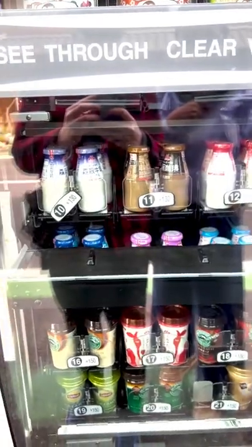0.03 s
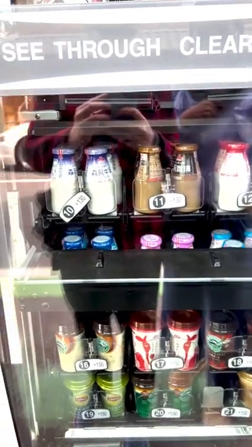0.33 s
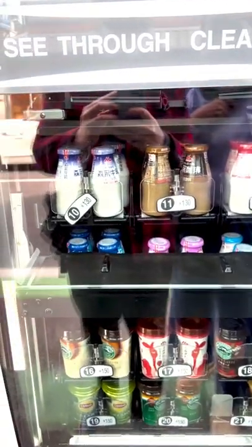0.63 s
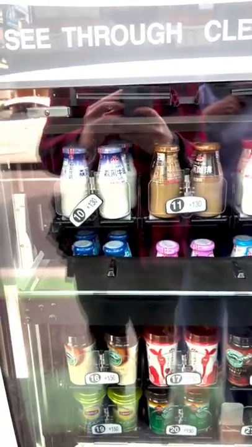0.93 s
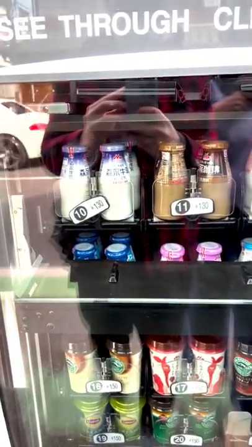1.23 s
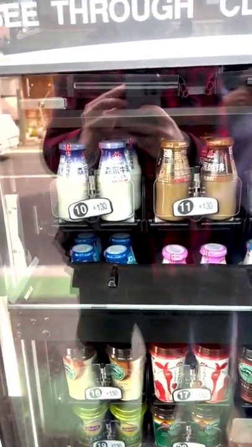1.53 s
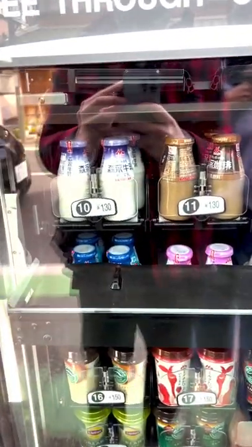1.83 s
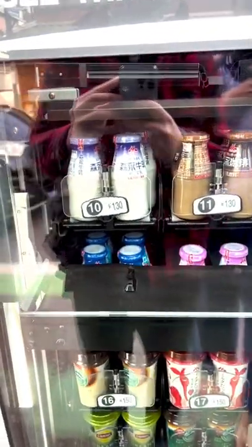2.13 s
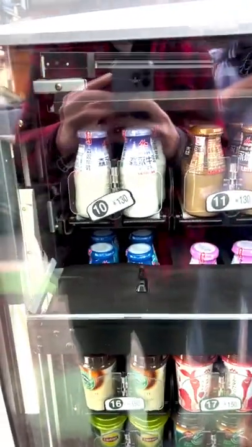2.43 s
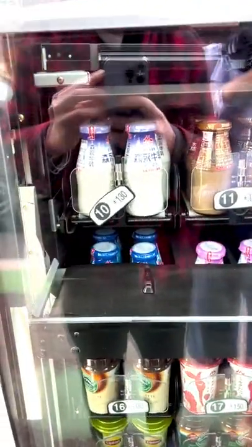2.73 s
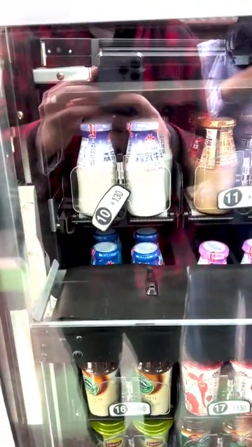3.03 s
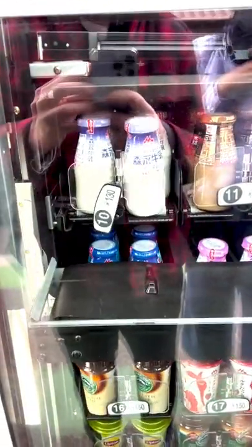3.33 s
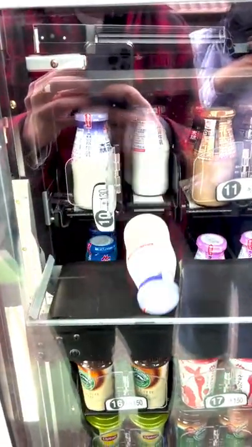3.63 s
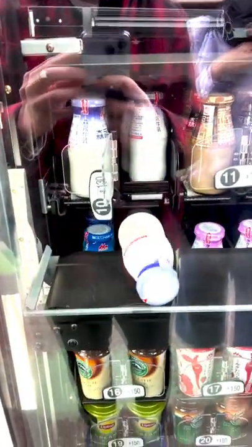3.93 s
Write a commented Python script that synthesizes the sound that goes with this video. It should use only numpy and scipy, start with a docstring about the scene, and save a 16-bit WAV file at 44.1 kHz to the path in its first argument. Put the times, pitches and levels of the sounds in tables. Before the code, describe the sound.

A vending machine clicks, hums and drops a bottle with a loud clunk over traffic rumble.

```python
"""Steady traffic rumbles, and dull knocks sound from a glass-fronted vending machine close by.
Its mechanism clicks, then a motor hums up to speed and pushes a row of faintly creaking plastic bottles.
One leaves its shelf, scrapes past the pinging gate and lands with a clunk, the loudest moment:
its shell cracks briefly and the delivery tray rattles and rings low. Short reflections inside the
cabinet follow the clicks and the landing, while the street carries on behind."""
import sys
import numpy as np
from scipy import signal
from scipy.fft import rfft, irfft
from scipy.io import wavfile
from scipy.ndimage import uniform_filter1d, minimum_filter1d

SR = 44100
rng = np.random.default_rng(int(sys.argv[2]) if len(sys.argv) > 2 else 0)


def pcm_store(signal):
    """Save signal as 16-bit PCM."""
    levels = np.round(np.clip(np.atleast_2d(signal), -1, 1) * 32767)
    wavfile.write(sys.argv[1], SR, levels.astype(np.int16).T)


N = 176400
T = np.arange(N) / SR
HZ = np.fft.rfftfreq(N, 1 / SR)


# the bottle lands with one clunk: a main layer and a far fainter one
# (time [s], thud [dB], crack [dB], hardness [Hz])
CLUNK = [(3.6198, 9.5, -20.5, 2500), (3.6297, -20, -56, 650)]
# modes of the delivery tray (pitch [Hz], relative level [dB], t60 [s])
TRAY_MODES = [(73, -23.5, 0.23), (112.6, -19, 0.15), (131.7, -14, 0.73), (155.7, -27, 0.57),
              (256.3, -12.5, 0.18), (280.3, -12, 0.26), (313, -29.5, 0.17), (335, -20, 0.29),
              (363, -17, 0.05), (527, -35, 0.042), (534, -25, 0.14), (604, -20, 0.09), (670, -36.5, 0.18),
              (756, -35.5, 0.15), (833, -35, 0.05), (1006, -25.5, 0.053)]

def tray(lag_s=0.0029, rise_s=0.0022):
    """The landing bottle sets the tray's modes ringing; the bass booms on."""
    out = 0
    for hz, db, t60 in TRAY_MODES:
        lean_db = 4.5 * max(np.log2(hz / 330), 0)  # higher modes sit further left
        mode = 0
        for start, thud_db, _, hard_hz in CLUNK:
            force = amp(thud_db) / np.hypot(1, (hz / hard_hz) ** 2)
            mode = mode + force * ring(start + lag_s, hz, t60, rise_s)
        out = out + amp(db) * pan(lean_db) * mode
    return out


# tone of the first snap (frequency [Hz], relative level [dB])
SNAP_COLOUR = [(300, -3), (900, 12), (2000, -6), (6000, -12), (8000, -7), (10000, -13.5), (11600, -22),
               (13000, -40)]
# tone of the tray's many small, close modes (frequency [Hz], relative level [dB])
RATTLE_COLOUR = [(18, -25), (42, 4), (120, 2), (210, 8), (380, 4), (480, 6.5), (750, -8.5), (1200, -22.5),
                 (2000, -31), (4000, -55)]

def first_contact(snap_db=-27, rattle_db=-9.5):
    """The bottle's first touch snaps sharply and shakes the tray into a short, dense rattle."""
    start = CLUNK[0][0]
    snap = unit(colour(stereo_noise(0.45), amp(read(SNAP_COLOUR, HZ))))
    snap *= decay(start, t60=0.0098, rise=0.00018, hold=0.0012)
    rattle = unit(colour(stereo_noise(0.5), amp(read(RATTLE_COLOUR, HZ))))
    rattle *= decay(start, t60=0.19, rise=0.0032)
    return amp(snap_db) * snap + amp(rattle_db) * rattle


# resonances of the plastic bottle (centre [Hz], width [Hz], relative level [dB])
BOTTLE_BANDS = [(1550, 350, -1), (2030, 530, 0), (2520, 300, -6), (3180, 430, -1.5), (4340, 520, -5.5),
                (5660, 400, -0.5), (6830, 500, -6.5), (7900, 450, -8.5)]

def bottle_crack():
    """The plastic shell cracks briefly as it hits the tray."""
    out = 0
    for hz, width_hz, db in BOTTLE_BANDS:
        length = (2000 / hz) ** 0.6  # higher bands die sooner
        envelope = sum(amp(crack_db) * decay(start, 0.042 * length, rise=0.00014, hold=0.0053 * length)
                       for start, _, crack_db, _ in CLUNK)
        out = out + amp(db) * envelope * unit(colour(stereo_noise(0.93), peak(hz, width_hz)))
    return out / len(BOTTLE_BANDS) * 2 * pan(lean_db=3)


# envelope of the bottle rubbing the gate (time [s], level [dB])
SCRAPE_LEVEL = [(3.559, -59), (3.567, -31.5), (3.577, -34), (3.598, -31.5), (3.611, -36.5), (3.621, -31)]
# tone of that rub (frequency [Hz], relative level [dB])
SCRAPE_COLOUR = [(150, 15.5), (310, 23.5), (480, 7), (700, 15), (1000, 14), (1500, -3), (2700, -5.5),
                 (3400, 4), (4700, -4.5), (7500, -5.5), (10000, -14), (11600, -20), (12500, -47)]

def gate_scrape(slips_per_s=20000, slip_spread_db=4, ping_db=-30.5):
    """The gate pings as it lets go, and the bottle slides past it in a run of tiny slips."""
    slips = rng.random(N) < slips_per_s / SR
    strength = amp(slip_spread_db * np.minimum(rng.exponential(1, N), 2))
    rub = unit(colour(slips * strength * stereo_noise(0.66), amp(read(SCRAPE_COLOUR, HZ))))
    level_db = np.interp(T, *np.transpose(SCRAPE_LEVEL), left=-np.inf, right=-np.inf)
    ping = ring(start=3.5665, hz=2045, t60=0.046, rise=0.002)
    return amp(level_db) * rub + amp(ping_db) * ping


# run of the dispensing motor (time [s], speed [Hz], level [dB])
MOTOR_RUN = [(2.148, 58.2, -61), (2.21, 59, -30), (2.26, 60.75, -35), (2.321, 64.44, -22),
             (2.469, 72.53, -21), (2.569, 78.97, -17), (2.71, 82.8, -23), (2.81, 82.2, -21.5),
             (2.94, 80.9, -26), (3.019, 81.16, -22), (3.42, 81.1, -25.5), (3.48, 81.5, -36)]
# partials of its hum (multiple of the speed, relative level [dB], change at full strain [dB])
MOTOR_ORDERS = [(.5, -38, -5), (1, -0.5, 0.5), (1.5, -23, -9), (2, -21, 12), (3, -32, 5)]
# narrow resonances it shakes (centre [Hz], width [Hz], level at the motor's loudest [dB])
MOTOR_RINGS = [(40.7, 9.7, -40.5), (427.2, 9.5, -46)]

def motor(full_strain_hz_per_s=87, ease_s=0.1, waver_db=-0.24):
    """A low hum that spins up with straining overtones, holds its speed and stops as the bottle tips."""
    times, speeds, levels = np.transpose(MOTOR_RUN)
    hz = np.interp(T, times, speeds)
    fade = np.interp(T, [times[0] - 0.02, times[0], times[-1], times[-1] + 0.024], [0, 1, 1, 0])
    gain = amp(np.interp(T, times, levels)) * fade
    strain = np.clip(np.gradient(hz, T) / full_strain_hz_per_s, 0, 1)
    strain = uniform_filter1d(strain, round(ease_s * SR))
    turns = np.cumsum(hz) / SR
    hum = 0
    for multiple, db, strain_db in MOTOR_ORDERS:
        waver = unit(colour(rng.standard_normal(N), peak(0, width_hz=18)))
        tone = np.sqrt(2) * np.sin(2 * np.pi * multiple * turns)
        hum = hum + amp(db + strain_db * strain + waver_db * waver) * tone
    rings = sum(amp(db) * unit(colour(rng.standard_normal(N), peak(centre, width)))
                for centre, width, db in MOTOR_RINGS)
    return gain * hum + np.sqrt(gain / gain.max()) * rings


# dull knocks (time [s], pitch [Hz], level [dB])
KNOCKS = [(.441, 259, -20.5), (.463, 180.6, -19), (0.697, 292, -27.5), (3.858, 439, -29.5)]

def knocks(t60_s=0.15, rise_s=0.014, puff_db=-7):
    """Soft, hollow bumps: a low note in a dull puff of noise."""
    puff = amp(puff_db) * unit(colour(stereo_noise(0.83), peak(hz=240, width_hz=150)))
    return sum(amp(db) * (ring(start, hz, t60_s, rise_s) + puff * decay(start, t60_s, rise_s))
               for start, hz, db in KNOCKS)


# clicks of the mechanism (time [s], level [dB], t60 [s], treble cutoff [Hz])
CLICKS = [(1.3987, -48, 0.022, 7000), (1.5062, -34, 0.0055, 10000), (1.5247, -30.5, 0.0066, 15000),
          (1.548, -33, 0.0096, 12000), (1.552, -42, .025, 10500), (1.5579, -33.5, 0.019, 9500),
          (1.566, -40.5, .014, 7000), (1.7897, -41, 0.017, 9000), (1.797, -50, 0.13, 6500),
          (1.883, -48, .04, 9600), (1.888, -37.5, .022, 1880)]
# tone they share (frequency [Hz], relative level [dB])
CLICK_COLOUR = [(300, -28), (1500, -2), (2600, -7), (3600, 7), (4900, -1.5), (7800, 0), (10000, -7.5),
                (12000, -3), (15000, -20)]

def clicks():
    """Small dry ticks of the mechanism: bursts of noise, each with its own brightness."""
    noise, tone = stereo_noise(0.61), amp(read(CLICK_COLOUR, HZ))
    out = 0
    for start, db, t60, top_hz in CLICKS:
        tick = unit(colour(noise, tone / np.hypot(1, (HZ / top_hz) ** 10)))
        out = out + amp(db) * decay(start, t60, rise=0.00037, hold=0.0005) * tick
    return out


# thin creaks of the pushed bottles (time [s], pitch [Hz], level [dB])
CREAKS = [(2.632, 10300, -48), (3.166, 11000, -47), (3.346, 11740, -44)]

def creaks(width_hz=2300):
    """Faint, very high ticks as the row of bottles shifts."""
    noise = stereo_noise(0.3)
    return sum(amp(db) * decay(start, t60=0.015, rise=0.00071) * unit(colour(noise, peak(hz, width_hz)))
               for start, hz, db in CREAKS)


def cabinet(x, echo_db=-9.5, t60_s=0.052, predelay_s=0.003, band_hz=(450, 8500)):
    """Adds short, dense reflections inside the machine, without deep bass or top treble."""
    t = np.arange(SR // 3) / SR
    reflections = rng.standard_normal((2, len(t))) * amp(-60 * t / t60_s) * (t > predelay_s)
    reflections /= np.linalg.norm(reflections, axis=1, keepdims=True)
    send = signal.sosfilt(signal.butter(4, band_hz, "band", fs=SR, output="sos"), x)
    return x + amp(echo_db) * signal.fftconvolve(send, reflections, axes=1)[:, :N]


# tone of the traffic bed (frequency [Hz], relative level [dB])
STREET_COLOUR = [(12, -57), (24, -30), (36, -6.5), (55, -6.5), (82, 0.86), (112, -6), (145, -5.5),
                 (205, -12.5), (300, -15.5), (350, -20), (425, -17.5), (490, -23), (700, -21), (950, -25.5),
                 (1250, -27), (2400, -34.5), (3700, -37.5), (5000, -43.5), (6700, -44.5), (8800, -48),
                 (10200, -52.5), (11600, -53), (15000, -69)]
# its stereo image (frequency [Hz], left-right likeness [0-1])
STREET_LIKENESS = [(100, .999), (300, 0.92), (550, 0.18), (1200, 0.51), (2600, 0.1), (4000, 0.067),
                   (8000, 1), (11000, 0.069)]
# its balance (frequency [Hz], left minus right [dB])
STREET_LEAN = [(250, -1), (600, 1.7), (1500, 2.1), (4000, 1), (8000, -0.5)]
# ride on its midrange (time [s], level before band weighting [dB])
MID_SWELL = [(0, 2.5), (.8, 1.74), (1.3, 1.5), (1.75, 0.5), (2.1, -0.5), (2.7, 3), (3.4, 3.5), (4, 2.5)]
# ride on its treble (time [s], level before band weighting [dB])
TREBLE_SWELL = [(0, -2), (.6, 0.5), (1.3, 1.5), (1.75, 2.5), (2.5, 3), (3.3, 0), (3.7, 1.5), (4, -2)]

def street(level_db=-34.5, top_hz=11750, patchy_db=1.32):
    """Traffic rumble and tyre hiss, drifting in patches; midrange and treble swell slowly."""
    tone = amp(read(STREET_COLOUR, HZ)) / np.hypot(1, (HZ / top_hz) ** 80)
    bed = amp(level_db) * unit(colour(stereo_noise(read(STREET_LIKENESS, HZ)), tone))
    hz, t, bands = signal.stft(bed, SR, nperseg=1024, noverlap=768)
    patches = uniform_filter1d(rng.standard_normal(bands.shape[1:]), size=12, axis=0)  # across frequency
    patches = unit(uniform_filter1d(patches, size=30, axis=1))  # across time
    drift_db = patchy_db * patches * np.minimum(hz / 400, 1)[:, None]  # the bass stays steadier
    mid_weight = read([(100, 0.96), (300, 1.33), (800, 0.74), (3000, 0.067)], hz)
    treble_weight = read([(1500, 0.1), (5000, 0.73)], hz)
    mid_db = np.outer(mid_weight, np.interp(t, *np.transpose(MID_SWELL)))
    treble_db = np.outer(treble_weight, np.interp(t, *np.transpose(TREBLE_SWELL)))
    bands = bands * amp(drift_db + mid_db + treble_db) * pan(read(STREET_LEAN, hz))[:, :, None]
    return signal.istft(bands, SR, nperseg=1024, noverlap=768)[1][:, :N]


def amp(db):
    """Decibels to gain."""
    return 10 ** (np.asarray(db) / 20)


def pan(lean_db):
    """Left and right gains, the left louder by lean_db."""
    return amp(lean_db * np.array([[0.5], [-0.5]]))


def unit(x):
    """Scales to rms 1."""
    return x / np.sqrt(np.mean(x ** 2) + 1e-20)


def read(points, hz):
    """Reads a table along a log-frequency axis."""
    f, value = np.transpose(points)
    return np.interp(np.log(hz + 1), np.log(f + 1), value)


def colour(x, gain):
    """Filters by a gain for each frequency."""
    return irfft(rfft(x) * gain, N)


def stereo_noise(likeness):
    """Two channels of white noise, from wide (likeness 0) to mono (1)."""
    left, other = rfft(rng.standard_normal((2, N)))
    likeness = np.clip(likeness, -1, 1)
    right = likeness * left + np.sqrt(1 - likeness ** 2) * other
    return irfft(np.array([left, right]), N)


def peak(hz, width_hz):
    """Gain of a steep-sided resonance."""
    return 1 / (1 + ((HZ - hz) / (width_hz / 2)) ** 2)


def decay(start, t60, rise, hold=0):
    """Envelope: quick rise, hold, exponential fall; all times in seconds."""
    t = np.maximum(T - start, 0)
    fall = np.log(1000) * np.maximum(t - hold, 0) / t60
    return (1 - np.exp(-t / rise)) * np.exp(-np.minimum(fall, 20))


def ring(start, hz, t60, rise):
    """One struck mode."""
    return decay(start, t60, rise) * np.sin(2 * np.pi * hz * (T - start))


def scene():
    """The machine at work in front of the street."""
    direct = street() + motor() + knocks()
    inside = clicks() + creaks() + gate_scrape() + first_contact() + bottle_crack() + tray()
    return direct + cabinet(inside)


def record(dry, mono_below_hz=330, limit_db=-0.9, release_db_per_s=14, top_hz=15700):
    """Close-set microphones hear the bass alike; a limiter holds the peaks; the top treble is cut."""
    side = colour((dry[0] - dry[1]) / 2, HZ ** 2 / np.hypot(HZ ** 2, mono_below_hz ** 2))
    x = dry.mean(0) + np.array([side, -side])
    over_db = np.maximum(20 * np.log10(abs(x).max(0) + 1e-9) - limit_db, 0)
    release_db = T * release_db_per_s
    gain_db = release_db - np.maximum.accumulate(over_db + release_db)
    gain_db = uniform_filter1d(minimum_filter1d(gain_db, size=128), size=128)  # ease in before each peak
    lowpass = signal.firwin(511, top_hz, window=("kaiser", 9), fs=SR)
    return signal.oaconvolve(x * amp(gain_db), lowpass[None], "same")


dry = scene()
out = record(dry)
pcm_store(out)
```